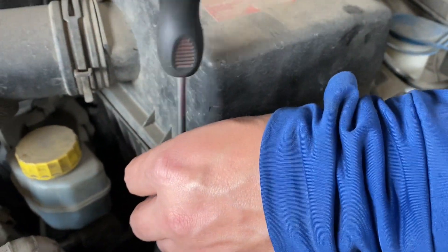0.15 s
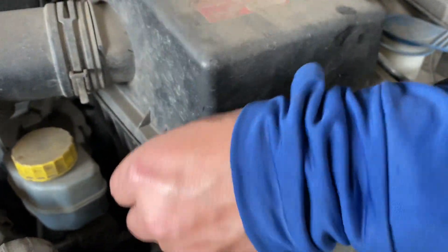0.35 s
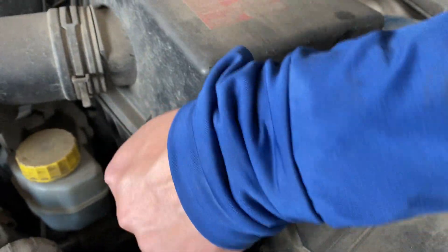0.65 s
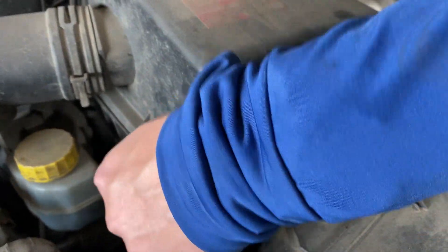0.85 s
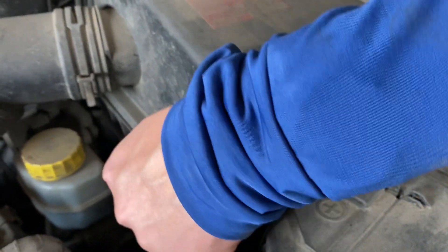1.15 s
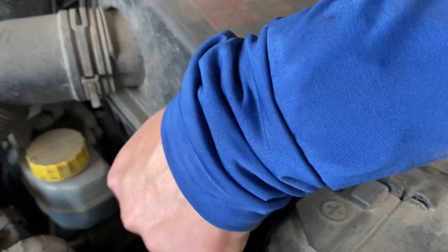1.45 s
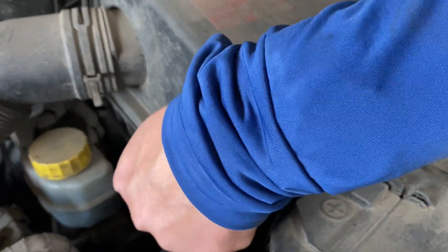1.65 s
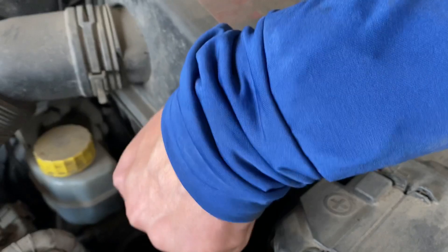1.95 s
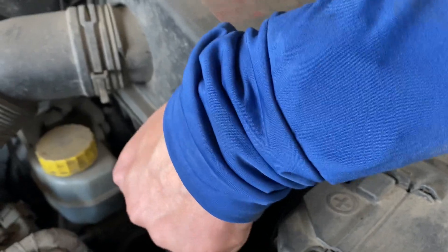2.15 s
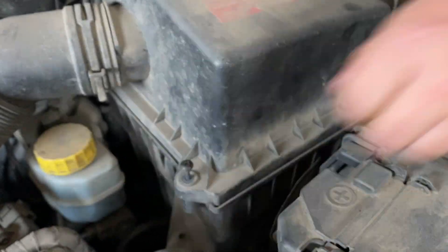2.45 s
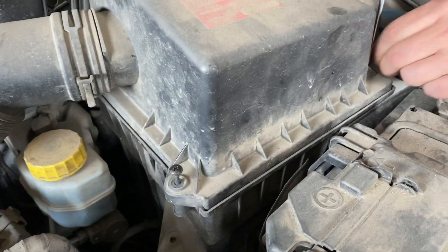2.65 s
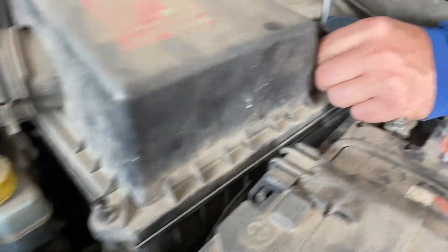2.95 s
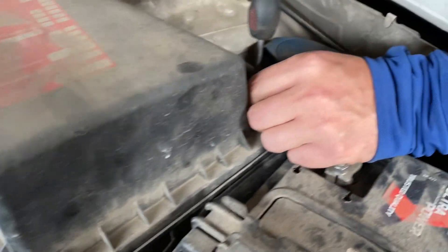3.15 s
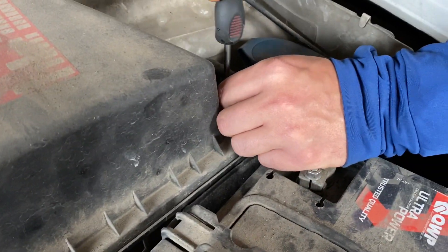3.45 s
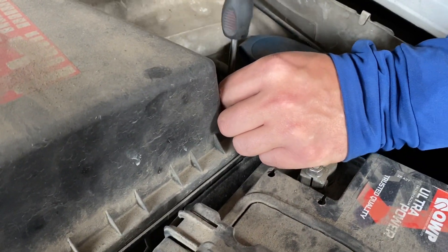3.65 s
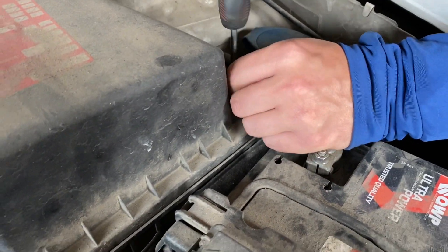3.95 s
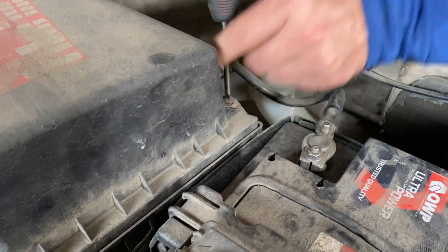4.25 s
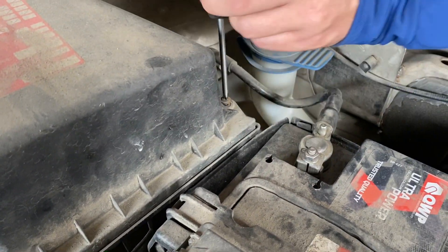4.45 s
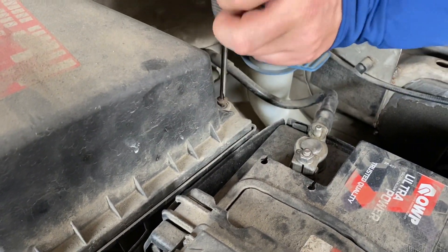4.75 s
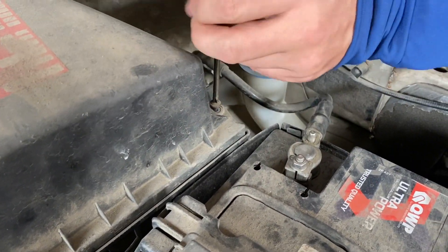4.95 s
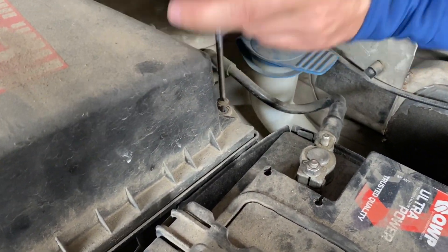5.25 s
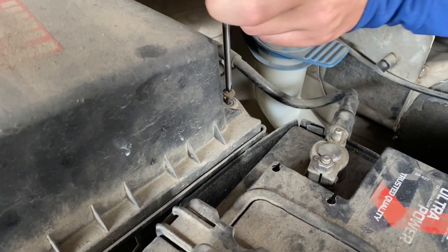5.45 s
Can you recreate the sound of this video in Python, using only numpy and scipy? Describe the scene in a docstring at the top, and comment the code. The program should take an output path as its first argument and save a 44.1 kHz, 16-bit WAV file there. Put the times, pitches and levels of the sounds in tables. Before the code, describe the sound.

Irregular, mostly faint screw-turning on a hollow plastic box: gritty scrapes, light knocks, a single clearer bump, thin squeaks. Midway the clicks gather into a sharp loud knock, then cloth swishes, and two more strong knocks follow among scrapes. Heard close up, slightly left, with fabric rustling, a soft low engine hum and a brief diffuse garage echo.

```python
"""Backing screws out of an air-box lid

A screwdriver works on a plastic lid in an engine bay: struck lid, wall and housing modes make knocks and bumps.
Stick-slip noise scrapes as the thread turns, the blade drags and the palm rubs; narrow resonances chirp.
Bursts of noise tick like grit, and fine hiss follows the sleeve. A wavering engine hum lies low behind it all.
The bay and the garage walls answer the hits with diffuse tails.
"""
import sys
import numpy as np
from scipy import signal
from scipy.fft import rfft, irfft, next_fast_len
from scipy.io import wavfile
from scipy.ndimage import map_coordinates

SR = 44100
rng = np.random.default_rng(int(sys.argv[2]) if len(sys.argv) > 2 else 0)


def unload_audio(sound):
    """Save the sound as a 16-bit wav file, at the path given as the first command line argument."""
    columns = np.transpose(np.atleast_2d(sound))
    # keep every value between -1 and 1, then stretch to whole-number steps
    steps = np.round(np.clip(columns, -1, 1) * 32767)
    wavfile.write(sys.argv[1], SR, steps.astype(np.int16))


N = 247401
TIME = np.arange(N) / SR

# blade knocks on screw and lid:
# (time [s], level [dB], thud [dB], snap [dB], edge [dB], left over right [dB])
KNOCKS = [(0.795, -52, 34, 7.5, 6, 4), (0.952, -50.5, 8, -3, 5, 7), (1.108, -48, 0, -2, 19.5, 5),
          (1.124, -50, 14, 4, 13, 4), (1.172, -50.5, 1, 4, 3, 6), (1.273, -40.5, 26, -8, -8, 2),
          (1.341, -43.5, 24, -9.5, 3, 5), (1.821, -41.5, -13, -5, 9, 1), (2.081, -54, 14, 1, 10, 6),
          (2.237, -43.5, 16, -3, -1, 5), (2.266, -41, 17, -7, -7, 2), (2.335, -52.5, 20, -3.5, 9, 10),
          (2.639, -34, 27, 0, 17, 2.5), (2.713, -48, 24, 8, 19, 0), (2.732, -59.5, 14, 6, 14, 2),
          (2.762, -57, 12, 3.5, 15, -1), (2.845, -52, 12.5, 0.5, 12, 0), (2.896, -41, 20, -18, -8, -1),
          (2.911, -31, 5, -19, -7, 3), (2.925, -26.5, 16, -14, 1.5, 0), (3.082, -26.5, 14.5, -0.5, 8, 3.5),
          (3.2, -7, 10.5, 1.5, 7, 4.5), (3.2034, -22.5, 2, 14, 4.5, 5), (3.418, -28, 15.5, 0, 14, 9),
          (3.425, -27.5, 0, -1, 11, -1), (3.441, -19, 13, -8.5, -17, 0), (3.773, -40.5, 16, 0, 4, 6),
          (3.868, -43, 8, -17, 2.5, 4), (3.915, -35.5, 9, -24, 1, 4), (4.113, -53, 5, -10, -1, 1),
          (4.127, -42, 6, -2, -11, 3), (4.169, -45.5, 15.5, -7, 11, 5), (4.346, -33.5, 5, -17, -10, 2),
          (4.561, -4.5, 5.5, -6, -0.5, 4), (4.915, -9.5, 6, -8.5, 2.5, 3.5),
          (5.338, -37.5, 12, -8, 10.5, -3)]
# modes of the plastic lid: (frequency [Hz], level [dB], t60 [s])
LID_MODES = [(140, -27, .05), (205, -21, .05), (270, -19, .028), (367, -24, .03), (545, -13, .018),
             (690, -11, .024), (905, 0, .022), (1028, -1, .014), (1215, -12, .018), (1600, -.5, .025),
             (1690, -7, .014), (1990, -14, .012), (2260, -6.5, .011), (2590, -10, .014), (2800, -17, .012),
             (3330, -18, .013), (3950, -24, .009), (4520, -34, .008), (5445, -32, .014), (5808, -36, .012)]
# modes of the housing that rings on under the lid: (frequency [Hz], level [dB], t60 [s])
HOUSING_MODES = [(235, -46, .25), (625, -33, .2), (870, -30, .22), (1222, -31, .25), (1600, -34, .18),
                 (2480, -42, .16)]
# spectrum of the steel shaft's short clink: (frequency [Hz], density [dB per Hz])
STEEL_SPECTRUM = [(1500, -17.5), (3100, -10), (3400, -6), (3700, -5), (4000, 16), (4200, -8), (4550, 14.5),
                  (4900, -0.5), (5500, 5.5), (6100, -9.5), (7200, 0), (8200, -15), (9800, -9.5),
                  (12000, -7.5), (15500, -43)]
# gritty spectrum of the dragging blade, also used in knocks and bumps: (frequency [Hz], density [dB per Hz])
GRIT_SPECTRUM = [(300, -25), (550, 11), (950, -4), (1450, 5.5), (1850, -3), (2200, 1.5), (2450, -2),
                 (2700, -2.5), (3300, -19), (4150, -11.5), (4500, -7.5), (5000, -11.5), (5500, -14.5),
                 (6100, -19.5), (7500, -18), (14000, -35)]
LEAD_IN_DB = -17.5  # the swell before a knock, relative to its knock


def knocks():
    """The blade jumps in the screw head; thud, snap and edge weight the low, middle and high lid modes."""
    near, far = np.zeros((2, N)), np.zeros((1, N))
    for s, db, thud_db, snap_db, edge_db, pan_db in KNOCKS:
        colour = [(130, 0), (250, thud_db), (400, thud_db), (850, 0),
                  (1150, 0), (1600, snap_db), (3200, edge_db)]
        # light contacts land anywhere, so they excite the modes less evenly
        scatter_db = np.interp(db, [-45, -20], [3, .5])
        body = amp(db) * ring(LID_MODES, colour, travel=.0012, ports=1, scatter_db=scatter_db)
        housing = amp(db) * ring(HOUSING_MODES, colour, travel=.004, ports=.5, scatter_db=2)
        add(near, s - .0015, panned(body + housing, pan_db))
        clink = amp(db + edge_db - 27.0) * burst(STEEL_SPECTRUM, t60=0.023, alike=0.65)
        add(near, s - .001, clink)
        # a short noise swell, a decay played backwards, leads into each knock
        lead_in = amp(db + LEAD_IN_DB) * burst(GRIT_SPECTRUM, t60=0.018, alike=0.43)[:, ::-1]
        add(near, s - lead_in.shape[1] / SR, lead_in)
        add(far, s, spread(body, colour))
    return near, far


# spectrum of what a knock radiates into the room: (frequency [Hz], density [dB per Hz])
RADIATED_SPECTRUM = [(100, 7.5), (250, -7.5), (400, -12), (480, -10.5), (630, 0), (750, 5), (890, 5.5),
                     (1050, 7.5), (1220, 6), (1400, 2), (1610, 6.5), (1870, 3), (2070, -6), (2480, -5),
                     (2850, -14), (3300, -21.5), (4500, -26.5), (9000, -56.5)]


def spread(body, colour):
    """What a knock sends into the room: the same energy, its modes evened out over all directions."""
    size = 512
    impulse = signal.unit_impulse(size, size // 4)[None]
    pulse = filtered(impulse, lambda hz: amp(along(RADIATED_SPECTRUM, hz) + along(colour, hz)))
    return pulse * np.linalg.norm(body.mean(axis=0)) / np.linalg.norm(pulse)


# how much earlier the left port hears the shell: (frequency [Hz], phase [rad])
PORT_PHASE = [(150, 0.046), (500, 0.57), (950, 0.57), (1700, 1.32), (3000, 2.3), (6000, 2.5)]


def ring(modes, colour, travel, ports, scatter_db):
    """A struck shell at both ports: bending waves carry the high modes to the edge first."""
    hz, db, t60 = np.transpose(modes)[:, :, None]
    t = np.arange(SR // 6) / SR
    # travel is the time [s] a 1 kHz wave takes
    age = np.maximum(t - travel * np.sqrt(1000 / hz), 0)
    size = amp(db + along(colour, hz) + scatter_db * rng.standard_normal(hz.shape))
    # each mode builds up within about a cycle
    swell = 1 - np.exp(-(age * hz / .9) ** 2)
    life = size * swell * amp(-60 * age / t60)
    lags = (0, ports * along(PORT_PHASE, hz))
    return np.array([np.sum(life * np.sin(2 * np.pi * hz * age - late), axis=0) for late in lags])


# tool and hand bump the hollow side of the box: (time [s], level [dB], boom [dB], hardness [dB])
BUMPS = [(0.262, -39.5, -11, -16), (0.447, -43, 12, 0), (0.476, -52, 20, 7), (0.881, -46.5, 2, -1),
         (1.022, -46.5, 9, -16), (1.379, -38.5, 5.5, -5), (1.387, -67, -4, -10), (1.557, -34.5, -10, -1.5),
         (1.5944, -21, 4, 1), (1.6024, -31, 3, 6.5), (1.975, -43, 2.5, -3.5), (2.03, -39, -21, -14),
         (2.216, -39.5, -27, -14), (4.252, -44.5, 9, -10), (4.401, -44, -23, -26), (5.452, -43, -5, -26),
         (5.522, -34.5, -20, -44)]
# modes of the side wall of the box: (frequency [Hz], level [dB], t60 [s])
PANEL_MODES = [(235, -10.5, 0.17), (366, -8, 0.057), (388, -7.5, 0.017), (550, -35, 0.025), (629, 1, 0.027),
               (746, -6, 0.0064), (1030, -4.5, 0.03), (1202, -15, 0.072), (1340, -3, 0.012),
               (1580, -5.5, 0.012), (2240, -7, 0.0089), (2560, -6.5, 0.012), (3120, -15, 0.01),
               (4050, -46, .1), (4140, -12, 0.0052)]


def bumps():
    """The box wall rings: boom weights its low modes, hardness its upper modes and the contact noise."""
    out = np.zeros((2, N))
    for s, db, boom_db, hard_db in BUMPS:
        colour = [(350, boom_db), (620, 0.01), (2500, hard_db)]
        wall = amp(db) * ring(PANEL_MODES, colour, travel=.0017, ports=.2, scatter_db=1)
        add(out, s - .001, wall)
        contact = amp(db + hard_db - 10.5) * burst(GRIT_SPECTRUM, t60=0.045, alike=0.15)
        add(out, s, contact)
    return out


# dry ticks of grit in the thread: (time [s], peak level [dB], brightness [dB])
TICKS = [(0.3272, -42, -8), (1.1246, -39, -12), (1.461, -50.5, -16), (1.751, -49.5, -4), (1.8236, -42, -9),
         (2.18, -51.5, -5), (2.2434, -50, -17), (2.7073, -42, 4), (3.1301, -47.5, 5), (3.4172, -28, 2),
         (3.4241, -22, -3), (3.771, -50, 6), (4.0044, -34.5, -1), (4.13, -42, -1), (4.279, -41.5, 12),
         (4.668, -50, -2), (4.733, -50, 3), (5.2582, -40, -5), (5.3376, -39, -2), (5.4257, -40, 11)]
# spectrum of a tick before its brightness tilt: (frequency [Hz], density [dB per Hz])
TICK_SPECTRUM = [(1000, -3.5), (3500, 5), (7000, 7), (12500, 10), (15500, 3)]


def ticks():
    """Grit breaks in the thread, too lightly to move the lid: bare decaying noise bursts."""
    out = np.zeros((2, N))
    for s, db, bright_db in TICKS:
        tilt = [(4000, 0), (13000, bright_db)]
        spectrum = [(hz, level + along(tilt, hz)) for hz, level in TICK_SPECTRUM]
        add(out, s, amp(db) * burst(spectrum, t60=.017, alike=.75))
    return out


def scraping():
    """Everything that rubs on the box: thread, blade, chirps and palm, leaning left."""
    return panned(thread() + blade() + squeaks() + palm(), pan_db=4.0)


# spells of turning a screw: (start time [s], end time [s], relative grinding level [dB])
TURNS = [(0.0, 0.168, -74), (0.338, 0.55, -63.5), (0.767, 1.4, -67.5), (1.46, 1.744, -63),
         (1.814, 1.882, -57.5), (1.942, 2.3, -65.5), (2.67, 2.957, -64.5), (2.996, 3.594, -61.5),
         (3.97, 4.16, -61), (4.449, 4.86, -59), (5.031, 5.314, -61), (5.309, 5.65, -59.5)]
# spectrum of the grinding thread: (frequency [Hz], density [dB per Hz])
THREAD_SPECTRUM = [(200, -5), (450, -1), (700, 3.5), (1100, -2), (1600, -7), (2400, -15), (4000, -23.5),
                   (9000, -38.5)]
RESTING_DB = -72  # relative level of the blade stirring in the slot between spells
TWISTS_PER_S, TWIST_DB = 28, 2.5  # the fingers twist unevenly: random knots a second, rms swing


def thread():
    """The thread grinds in the plastic by stick-slip, its strength following the twisting hand."""
    grind = patchy(slips(rate=900, uneven_db=3, bed_db=-3), depth_db=4)
    effort = amp(RESTING_DB) + sum(amp(db - 1.5) * spell(start, end) for start, end, db in TURNS)
    twist = amp(TWIST_DB * wobble(TWISTS_PER_S) - 0.5)
    return effort * twist * coloured(grind, THREAD_SPECTRUM)


GRIP_S = 0.043  # the grip tightens and lets go over this time


def spell(start, end):
    """A gate that opens and closes as the grip does."""
    return np.clip(np.minimum(TIME - start, end - TIME) / GRIP_S + .5, 0, 1)


# the blade drags over screw head and lid: (time [s], peak level [dB], half-length [s])
DRAGS = [(0.05, -54, 0.043), (0.11, -61, 0.014), (0.157, -63.5, 0.0078), (0.25, -60, 0.021),
         (0.387, -52, 0.0076), (0.455, -52, 0.0066), (0.472, -57, 0.003), (1.065, -57.5, 0.0084),
         (1.124, -51.5, 0.0068), (1.232, -63, .004), (1.282, -60, 0.016), (1.364, -58, .005),
         (1.5, -57, 0.0071), (2.06, -64.5, 0.031), (2.15, -79, 0.013), (2.716, -47.5, 0.013),
         (2.735, -50, .008), (2.76, -52, 0.013), (2.787, -60, 0.007), (2.815, -60, 0.0066),
         (2.845, -60, .01), (2.912, -54.5, 0.023), (4.37, -57.5, 0.018), (5.345, -48, 0.013),
         (5.385, -54, 0.023), (5.567, -57, .008)]


def blade():
    """The dragging blade catches and releases in short strokes."""
    drag = patchy(slips(rate=700, uneven_db=2, bed_db=-4), depth_db=4.5)
    return swells(DRAGS) * coloured(drag, GRIT_SPECTRUM)


# a tight thread chirps: (time [s], relative peak level [dB], half-length [s], pitch [Hz])
SQUEAKS = [(1.234, -76, 0.0068, 8250), (1.286, -71, 0.013, 8060), (1.351, -74, 0.013, 8250),
           (1.397, -72, .012, 8100), (1.455, -83, .012, 8300), (1.5, -64.5, .011, 8200),
           (1.561, -66, .015, 8100), (1.718, -66.5, 0.012, 8200), (1.747, -78, .009, 8000),
           (1.812, -72, .009, 8300), (1.854, -75, 0.011, 8300), (1.882, -74, .01, 8340),
           (1.939, -78, .009, 8300), (1.978, -64, 0.0098, 8000), (2.027, -77, .012, 8100),
           (2.059, -66.5, .015, 8150), (2.15, -69.5, 0.018, 8300), (2.223, -71, .017, 8200),
           (2.596, -64.5, .009, 6440), (2.67, -69, .012, 5800), (2.715, -54, 0.0099, 4970),
           (2.723, -56, 0.013, 5950), (2.757, -73, 0.011, 6400), (2.817, -74, 0.013, 6500),
           (2.842, -71, .012, 6500), (2.898, -77, 0.013, 5600), (2.992, -77, .008, 5400),
           (3.043, -66, 0.015, 5300)]
# resonances of a chirp pitched at SQUEAK_HZ: (frequency [Hz], width [Hz], level [dB])
SQUEAK_PEAKS = [(2600, 180, -29), (4400, 300, -2.5), (6800, 450, -8), (8140, 190, 2), (9200, 350, -3.5),
                (12500, 620, -9)]
SQUEAK_HZ = 8200
CHIRP_DRIFT_PER_S, CHIRP_ROUGH_DB = 0.6, 1.5  # rms relative glide of the pitch, rms scratchiness


def squeaks():
    """A tight thread sticks and slips in short chirps, each a few narrow resonances that drift in pitch."""
    chirps = np.zeros((2, N))
    t = np.arange(-SR // 20, SR // 20) / SR
    for s, db, half, hz in SQUEAKS:
        hiss = noise(alike=0.85, size=len(t))
        tone = unit(filtered(hiss, lambda f: resonances(f * SQUEAK_HZ / hz, SQUEAK_PEAKS)))
        # reading the tone at a changing speed glides its pitch
        drift = (t - t[0] + CHIRP_DRIFT_PER_S * rng.standard_normal() * t ** 2 / 2) * SR
        tone = np.array([map_coordinates(port, [drift]) for port in tone])
        add(chirps, s + t[0], amp(db) * np.exp(-(t / half) ** 2) * tone)
    return chirps * amp(CHIRP_ROUGH_DB * wobble(170) - 2)


# the hand rubs along the box: (time [s], peak level [dB], half-length [s])
RUBS = [(0.043, -55.5, 0.054), (0.387, -48, 0.013), (0.463, -46.5, 0.036), (1.382, -49, 0.011),
        (1.749, -51.5, 0.026), (1.837, -54, 0.015), (2.73, -49.5, 0.018), (4.25, -47, 0.02),
        (4.882, -56, 0.0083)]
# spectrum of the rubbing palm: (frequency [Hz], density [dB per Hz])
PALM_SPECTRUM = [(100, -18), (200, 6.5), (350, -1.5), (550, -3.5), (1200, -7.5), (3000, -26), (8000, -51)]


def palm():
    """Skin rubs on plastic: dull noise of uneven colour and strength in short strokes."""
    skin = patchy(noise(alike=0.77), depth_db=4)
    return swells(RUBS) * coloured(skin * amp(3.3 * wobble(180)), PALM_SPECTRUM)


# each move of the arm swishes the sleeve: (time [s], peak level [dB], rise and fall [s])
SWISHES = [(0.02, -58, 0.042), (0.11, -59.5, 0.011), (0.298, -66, 0.04), (0.51, -63.5, 0.33),
           (0.78, -60.5, 0.038), (0.93, -66, 0.45), (1.111, -65, 0.043), (1.283, -61, 0.01),
           (1.57, -62.5, 0.018), (1.73, -67, 0.011), (1.83, -57.5, 0.012), (2.039, -68, 0.027),
           (2.481, -58.5, 0.089), (2.72, -59.5, 0.074), (3.07, -67, 0.051), (3.2, -66.5, 0.093),
           (3.44, -57.5, 0.04), (3.598, -43.5, 0.061), (3.769, -54.5, 0.037), (4.021, -67.5, 0.18),
           (4.268, -56, 0.032), (4.49, -65, 0.077), (4.571, -56.5, 0.012), (4.81, -67, 0.21),
           (4.93, -67, 0.027), (5.122, -58.5, 0.032), (5.239, -59.5, 0.031), (5.361, -54.5, 0.025),
           (5.46, -58, 0.06), (5.61, -54, 0.0099)]
# spectrum of the sleeve: (frequency [Hz], density [dB per Hz])
CLOTH_SPECTRUM = [(200, -33.5), (500, 0), (1000, 2), (3000, -3.5), (6500, -3.5), (10000, -7), (13000, -6.5),
                  (15000, -14)]
# the cuff brushes the wrist: (time [s], peak level [dB], half-length [s])
CUFF_RUBS = [(3.6, -65, 0.027), (3.78, -62, .02), (3.87, -65, 0.016), (4.02, -68, 0.022),
             (4.08, -58, 0.014), (4.122, -59, 0.011), (4.268, -54, .025), (4.5, -67, .025),
             (4.68, -59, 0.013), (4.745, -68, .015), (4.82, -63, .04), (5.13, -64, 0.046),
             (5.24, -59, .025), (5.35, -67, 0.023), (5.48, -62, 0.064)]
# spectrum of the cuff's finer, brighter hiss: (frequency [Hz], density [dB per Hz])
CUFF_SPECTRUM = [(5000, -38), (8500, -9), (12500, -1.5), (15000, -7.5), (15800, 1.5)]
SWISH_ROUNDNESS = 1.08  # 1 = pointed peak, 2 = bell
STIR_DB, STIR_SWING_DB = -90.5, 5.5  # the cloth is never quite still


def sleeve():
    """Fibres of the sleeve slide over each other in a fine hiss that peaks with each move."""
    moves = np.zeros(N)  # power, so that overlapping moves add as noise does
    for s, db, fade in SWISHES:
        move = amp(db) * np.exp(-np.abs((TIME - s) / fade) ** SWISH_ROUNDNESS)
        moves += move ** 2
    stir = amp(STIR_DB + STIR_SWING_DB * wobble(23))
    fibres = patchy(noise(alike=0.26), depth_db=2)
    cloth = coloured(fibres * amp(0.88 * wobble(340)), CLOTH_SPECTRUM)
    cuff = swells(CUFF_RUBS) * coloured(noise(alike=0) * amp(4.2 * wobble(150)), CUFF_SPECTRUM)
    return np.sqrt(moves + stir ** 2) * cloth + cuff


# uneven level of the low hum: (time [s], level of the hum [dB])
HUM_LEVEL = [(0.0, -40.5), (0.47, -62), (0.5, -39.5), (0.56, -60), (0.65, -43.5), (0.83, -54), (0.9, -38),
             (0.95, -51), (1.12, -47), (1.18, -39.5), (1.22, -71), (1.28, -45), (1.43, -50.5), (1.5, -70),
             (1.53, -45.5), (2.32, -49.5), (2.34, -54.5), (2.42, -41), (2.46, -66), (2.54, -49.5),
             (2.74, -48.5), (2.9, -40), (2.95, -56), (3.06, -49), (3.13, -63), (3.21, -37), (3.24, -49.5),
             (3.32, -38.5), (3.55, -58), (3.9, -42.5), (4.02, -48.5), (4.15, -40.5), (4.18, -48),
             (4.51, -44.5), (4.59, -41), (4.6, -41.5), (4.88, -59.5), (4.93, -48), (5.15, -58.5),
             (5.21, -47), (5.24, -57), (5.33, -47.5), (5.58, -50), (5.6, -57)]
# spectrum of the garage rumble: (frequency [Hz], density [dB per Hz])
RUMBLE_SPECTRUM = [(20, -70.5), (35, -42.5), (50, -23), (75, 1), (105, 0), (140, 8.5), (168, -7.5),
                   (200, -1), (250, -8), (320, -13), (450, -24), (900, -42), (2000, -59.5), (5000, -56.5),
                   (14000, -57.5)]
HUM_HZ, HUM_WANDER_HZ, HUM_BEAT_DB = 114.65, 2.43, -6  # firing note, its drift, strength of its throb


def engine():
    """A wavering, beating firing note with a weak octave, over the rumble of the garage."""
    phase = 2 * np.pi * np.cumsum(HUM_HZ + HUM_WANDER_HZ * wobble(9)) / SR
    beat = amp(HUM_BEAT_DB) * (wobble(24) * np.sin(phase) + wobble(24) * np.cos(phase))
    octave = amp(-19.5) * np.sin(2 * phase + wobble(12))
    hum = amp(curve(HUM_LEVEL)) * unit(np.sin(phase) + beat + octave)
    rumble = amp(-51.0) * coloured(noise(alike=0.95), RUMBLE_SPECTRUM)
    return panned(hum + rumble, pan_db=0.87)


def reverb(x, decay, delay, alike):
    """A diffuse tail in which each frequency dies at its own speed."""
    hz, t, z = signal.stft(noise(alike, size=SR), SR, nperseg=256)
    tail = signal.istft(z * amp(-60 * t / along(decay, hz)[:, None]), SR, nperseg=256)[1]
    tail = tail / np.linalg.norm(tail[0])
    tail = np.pad(tail, ((0, 0), (round(abs(delay) * SR), 0)))
    return signal.fftconvolve(x.mean(axis=0)[None], tail, axes=1)[:, :N]


def slips(rate, uneven_db, bed_db):
    """Stick-slip: sharp releases of uneven size, rate a second, on a bed of fine friction."""
    released = rng.random(N) < rate / SR
    jerks = released * rng.uniform(-1.6, 1, N) * amp(uneven_db * wobble(60))
    return unit(jerks) + amp(bed_db) * noise(alike=0.15)


def patchy(x, depth_db, size_hz=350, size_s=.014):
    """Friction changes colour from moment to moment as the contact shifts."""
    z = signal.stft(x, nperseg=256)[2]
    rows, columns = np.indices(z.shape[1:])
    where = np.array([rows * SR / 256 / size_hz, columns * 128 / SR / size_s])
    knots = rng.standard_normal((160, 1200))
    field = map_coordinates(knots, where, order=1, mode="wrap")
    return signal.istft(z * amp(depth_db * unit(field)), nperseg=256)[1][:, :N]


def burst(spectrum, t60, alike):
    """Many close modes dying together, peak 1."""
    t = np.arange(SR // 12) / SR
    x = coloured(noise(alike, size=len(t)), spectrum) * amp(-60 * t / t60)
    return x / np.abs(x).max()


def resonances(hz, peaks):
    """The response of a set of (frequency [Hz], width [Hz], level [dB]) resonances."""
    return sum((-1) ** k * amp(db) * 1j * hz * width / (centre ** 2 - hz ** 2 + 1j * hz * width)
               for k, (centre, width, db) in enumerate(peaks))


def swells(rows):
    """Bell-shaped strokes from (time [s], peak level [dB], half-length [s]) rows."""
    return sum(amp(db) * np.exp(-((TIME - s) / half) ** 2) for s, db, half in rows)


def amp(db):
    """Decibels to gain."""
    return 10 ** (np.asarray(db) / 20)


def unit(x):
    """Scale to rms 1."""
    return x / np.sqrt(np.mean(x ** 2) + 1e-20)


def along(points, hz):
    """Read (frequency [Hz], value) points on a log axis."""
    f, v = np.transpose(points)
    return np.interp(np.log(hz + 1), np.log(f + 1), v)


def curve(rows):
    """One value per sample from (time [s], value) rows."""
    return np.interp(TIME, *np.transpose(rows))


def wobble(rate):
    """A smooth random curve with rate knots a second."""
    return map_coordinates(rng.standard_normal(int(N * rate / SR) + 4), [TIME * rate])


def filtered(x, response):
    """x times a response of frequency."""
    n = x.shape[-1]
    m = next_fast_len(n + 8192)
    return irfft(rfft(x, m) * response(np.fft.rfftfreq(m, 1 / SR)), m)[..., :n]


def coloured(x, spectrum):
    """x given a spectrum, at rms 1."""
    return unit(filtered(x, lambda hz: amp(along(spectrum, hz))))


def noise(alike, size=N):
    """White stereo noise whose channels are correlated by alike."""
    mid, side = rng.standard_normal((2, size))
    turn = np.arccos(np.clip(alike, -1, 1)) / 2
    return np.cos(turn) * mid + np.sin(turn) * np.array([side, -side])


def panned(x, pan_db):
    """Make the left channel pan_db louder than the right."""
    return x * amp([[pan_db / 2], [-pan_db / 2]])


def add(track, s, x):
    """Mix x into track at s seconds."""
    start = round(s * SR)
    x = x[:, max(-start, 0):]
    part = track[:, max(start, 0):][:, :x.shape[1]]
    part += x[:, :part.shape[1]]


# decay of the engine bay: (frequency [Hz], t60 [s])
BAY_DECAY = [(150, 0.25), (900, 0.03), (2500, 0.059), (8000, 0.0051)]
# decay of the garage: (frequency [Hz], t60 [s])
GARAGE_DECAY = [(120, .6), (500, 0.59), (1200, 0.57), (2500, 0.49), (4000, 0.43), (10000, 0.96)]


def scene():
    """The work on the lid, its hits echoed by the engine bay and the garage, over the engine."""
    near, far = knocks()
    small = bumps() + ticks()
    bay = amp(-14.5) * reverb(near + small, BAY_DECAY, delay=0.003134, alike=0.83)
    garage = amp(-13.5) * reverb(far + small, GARAGE_DECAY, delay=0.013, alike=0.089)
    hits = near + small + bay + garage
    # the hits carry no deep bass: all below about 85 Hz is cut away
    hits = signal.sosfilt(signal.butter(4, 85, "high", fs=SR, output="sos"), hits)
    return hits + scraping() + sleeve() + engine()


TOP_HZ = 15800  # nothing passes from here up


def record(dry):
    """The recorder's treble rolls off just under its band limit."""
    rolloff = [(14200, -0.5), (15700, -17.0)]
    return filtered(dry, lambda hz: amp(along(rolloff, hz)) * (hz < TOP_HZ))


dry = scene()
out = record(dry)
unload_audio(out)
```